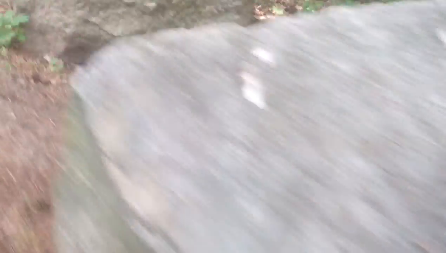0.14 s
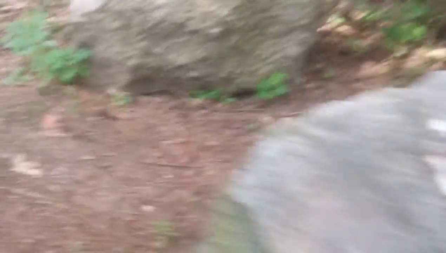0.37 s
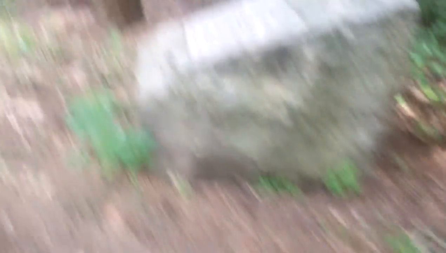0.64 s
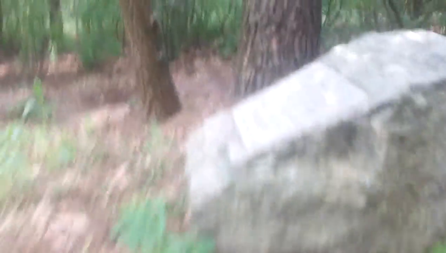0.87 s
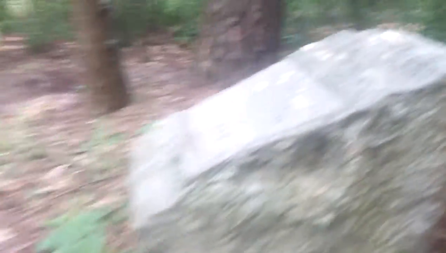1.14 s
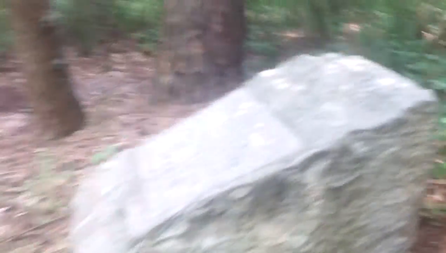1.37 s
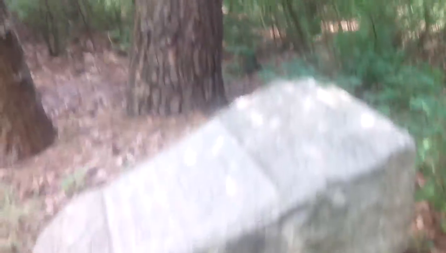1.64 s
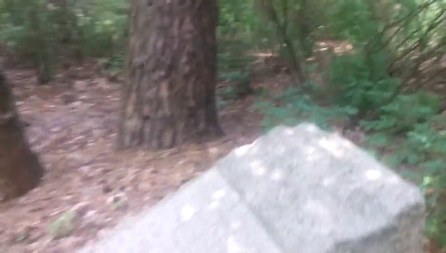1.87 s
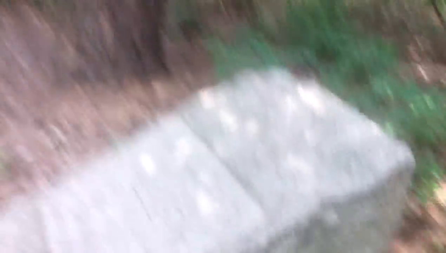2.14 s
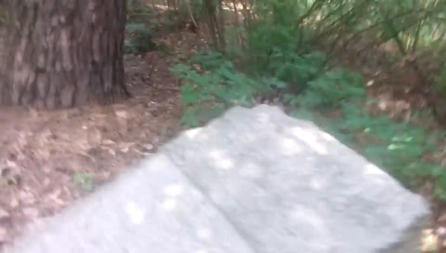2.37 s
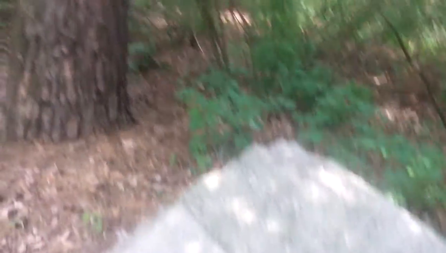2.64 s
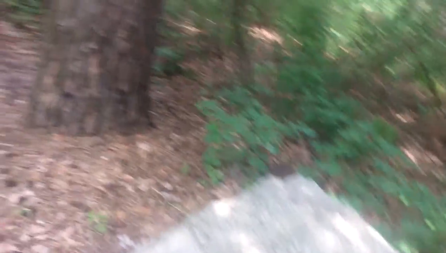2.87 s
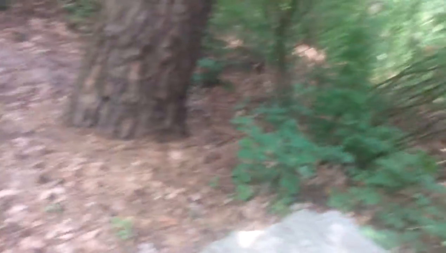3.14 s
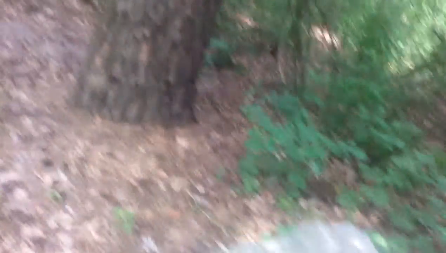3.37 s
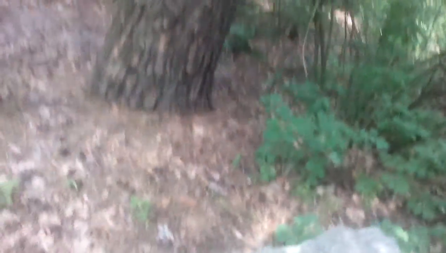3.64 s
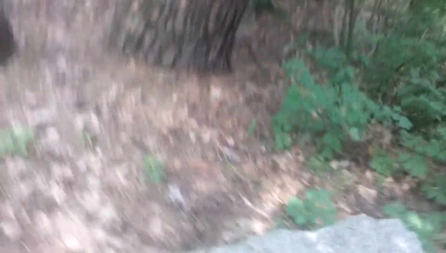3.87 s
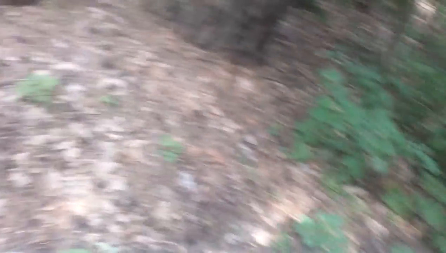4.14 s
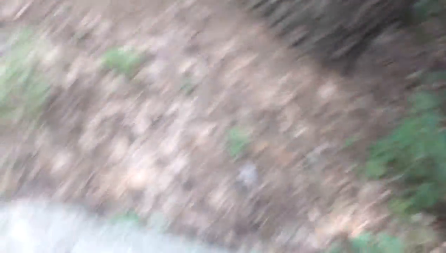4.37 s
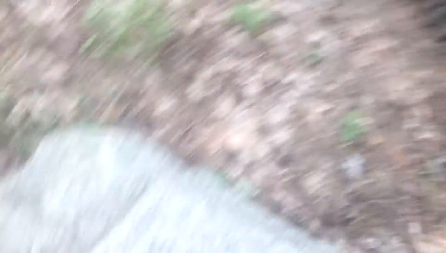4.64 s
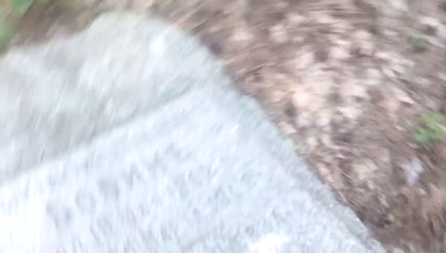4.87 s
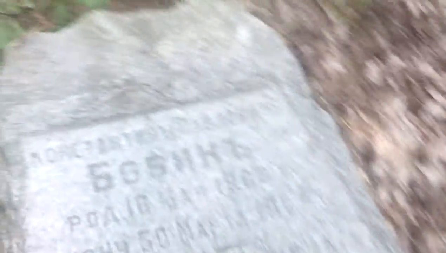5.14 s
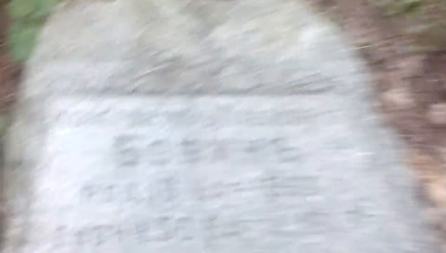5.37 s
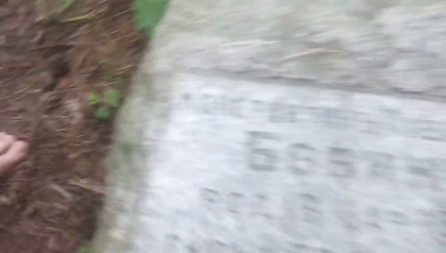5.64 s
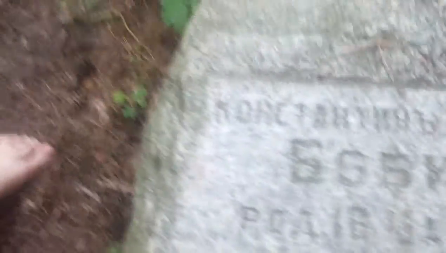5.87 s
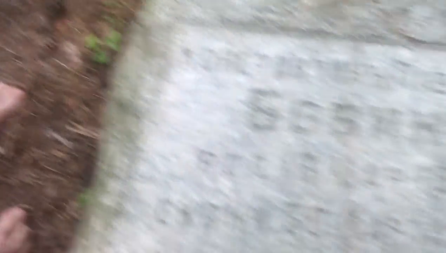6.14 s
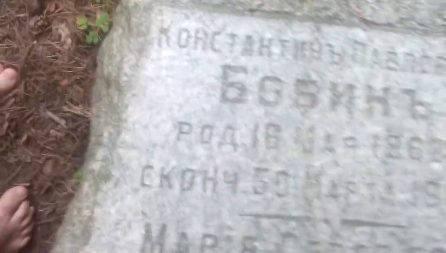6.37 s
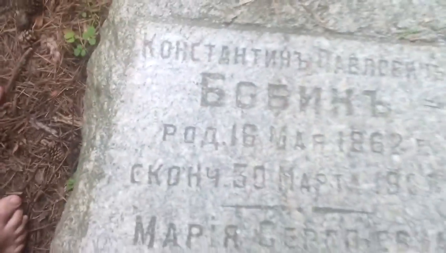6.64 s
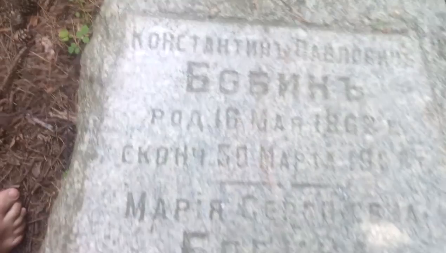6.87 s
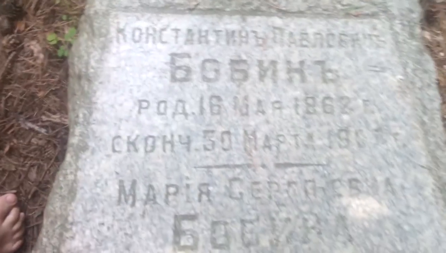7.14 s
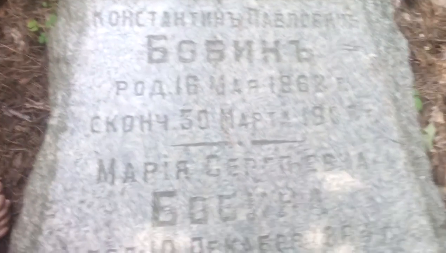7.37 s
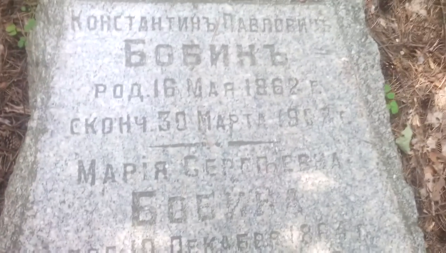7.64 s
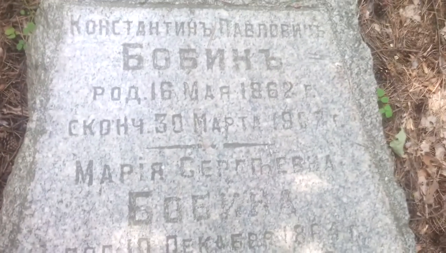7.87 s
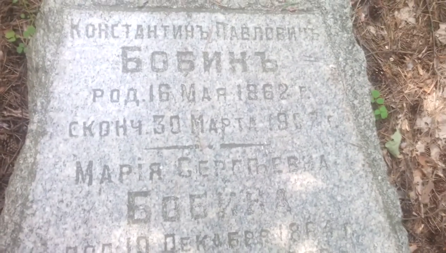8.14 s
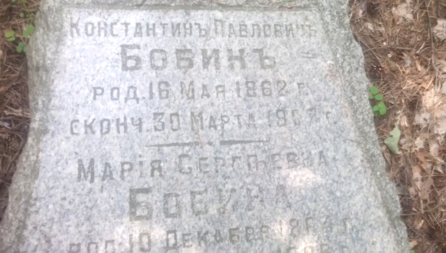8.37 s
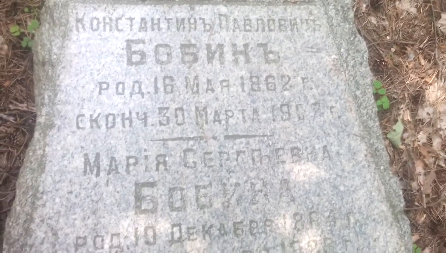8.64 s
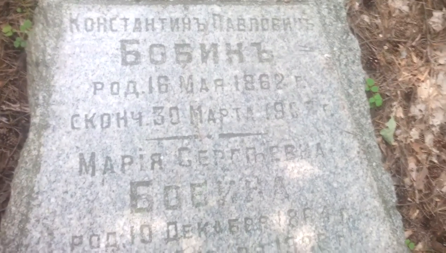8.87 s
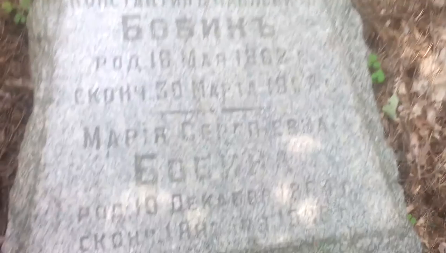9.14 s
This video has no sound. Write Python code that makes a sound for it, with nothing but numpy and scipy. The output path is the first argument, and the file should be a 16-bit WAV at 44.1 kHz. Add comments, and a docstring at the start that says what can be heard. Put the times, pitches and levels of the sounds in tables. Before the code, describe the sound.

Low handling thuds and rustling needles on a woodland floor, with thin falling bird whistles, then stillness under a faint hiss.

```python
"""Barefoot steps on a forest floor

Bare feet on soft ground, heard by a small hand-held stereo recorder. Each step jolts the recorder: a low, uneven
wobble plus filtered noise. Needles rustle on the right as shaped random grains; ticks and a twig are short ringing
modes. Songbirds whistle and buzz among the trunks as wobbling sines with a scattered tail; a fly hums faintly.
Distant rumble, microphone hiss and a late soft rush are coloured noise."""
import sys
import numpy as np
from scipy import signal
from scipy.fft import rfft, irfft, next_fast_len
from scipy.io import wavfile

SR = 44100
rng = np.random.default_rng(int(sys.argv[2]) if len(sys.argv) > 2 else 0)


def store_wav(level_fs):
    """Save 16-bit WAV to argv[1]."""
    pcm = np.round(np.clip(np.atleast_2d(level_fs), -1, 1) * 32767)
    wavfile.write(sys.argv[1], SR, pcm.T.astype(np.int16))


def linear_from_db(decibels):
    """Turn decibels (scalar or array-like) into linear amplitude factors; 0 gives 1."""
    return 10 ** (np.asarray(decibels, float) / 20)


N = 407925
T = np.arange(N) / SR


def level(x, db):
    """Scale to an rms level."""
    return x * linear_from_db(db) / np.sqrt(np.mean(x ** 2))


def colour(x, points):
    """Shape a spectrum by (Hz, dB) points, joined on a log frequency axis."""
    hz, db = np.transpose(points)
    size = next_fast_len(len(x))
    f = np.maximum(np.arange(size // 2 + 1) * SR / size, 1)
    gain = linear_from_db(np.interp(np.log(f), np.log(hz), db))
    return irfft(rfft(x, size) * gain, size)[:len(x)]


def cut(x, hz, kind, order=2):
    """Low- or high-pass."""
    return signal.sosfilt(signal.butter(order, hz, kind, fs=SR, output="sos"), x)


def walk(rate_hz, size=N):
    """Random levels joined by straight lines, rate_hz of them a second; spread 1."""
    levels = rng.standard_normal(1024)
    return np.interp(np.arange(size) * rate_hz / SR, np.arange(len(levels)), levels) / np.sqrt(2 / 3)


def hump(t, peak_s, rise_s, fall_s, span_db, power):
    """Level in dB that climbs to 0 at the peak and sinks again; times share the unit of t."""
    reach = np.where(t < peak_s, max(rise_s, .003), max(fall_s, .003))
    return -span_db * (np.abs(t - peak_s) / reach) ** power


def from_right(x, left_db, turn_hz):
    """The port pair hears a source on the right weaker on the left, with the treble reversed there."""
    low = cut(x, turn_hz, "low", order=1)
    return np.array([linear_from_db(left_db) * (2 * low - x), x])


# distant rumble and moving air: time_s, relative_level_db
RUMBLE = [(0.0, -62), (0.6, -57), (1.0, -65.5), (1.9, -60.5), (2.8, -64), (3.9, -60), (4.3, -61.5),
          (4.8, -62), (6.4, -64), (9.25, -67)]
# floor spectrum common to both ports: frequency_hz, gain_db
FLOOR_MID = [(15, -42), (25, -16.5), (55, 4), (110, 2), (170, -7), (300, -12.5), (800, -21.5), (1300, -25),
             (2400, -23), (3600, -21), (5400, -25), (6000, -29.5), (8500, -31.5), (12500, -21),
             (15800, -26)]
# floor spectrum opposed between the ports: frequency_hz, gain_db
FLOOR_SIDE = [(15, -41), (25, -15), (75, 1), (170, -6.5), (1000, -20), (1300, -21), (2400, -19),
              (5300, -10.5), (6000, -15), (8500, -11.5), (12900, -10.5), (15800, -10)]
HISS_MID_DB, HISS_SIDE_DB = -68.5, -64
AFTERSHAKE_DB, AFTERSHAKE_T60_S = -38.5, 0.37  # level relative to the jolt


def floor():
    """Shared rumble that swells, wavers and is stirred by each jolt, under a smooth wide hiss."""
    mid_noise = colour(rng.standard_normal(N), FLOOR_MID)
    rumble = level(cut(mid_noise, 300.0, "low", order=3), 0.5)
    hiss = level(cut(mid_noise, 270., "high", order=3), HISS_MID_DB)
    # the hand keeps shaking after a jolt
    shake_power = sum(
        (T > s) * linear_from_db(2 * (db + AFTERSHAKE_DB - 60 * np.abs(T - s) / AFTERSHAKE_T60_S))
        for s, db, *_ in THUMPS)
    rumble_power = linear_from_db(2 * np.interp(T, *np.transpose(RUMBLE)))
    waver = linear_from_db(1.0 * walk(11.))
    mid = np.sqrt(rumble_power + shake_power) * waver * rumble + hiss
    side = level(colour(rng.standard_normal(N), FLOOR_SIDE), HISS_SIDE_DB)
    return np.array([mid + side, mid - side])


# litter creeping under shifting weight between bursts: time_s, relative_level_db
SHUFFLE = [(0.0, -70), (0.6, -66), (0.95, -64.5), (1.5, -70.5), (2.1, -73.5), (2.7, -86.5), (4.3, -89),
           (4.65, -80.5), (5.0, -71), (5.35, -59), (5.6, -62), (6.1, -80), (6.9, -74), (7.2, -97),
           (9.25, -99)]
# needles and leaves underfoot: peak_s, relative_level_db, rise_s, fall_s, top_relative_db
RUSTLE = [(0.16, -45, 0.083, 0.11, -2.5), (0.33, -53.5, 0.16, 0.071, -3), (0.41, -47.5, 0.059, 0.065, -2),
          (0.67, -48, 0.022, 0.057, 6), (0.73, -41.5, 0.13, 0.13, -1.5), (0.82, -46, 0.055, 0.082, -9),
          (1.03, -60, 0.093, .3, -5), (1.23, -65, .2, 0.1, -6), (2.2, -55, 0.26, .1, -4.5),
          (2.4, -66.5, 0.16, 0.12, 1.5), (2.54, -66, 0.057, .06, -12.5), (3.522, -66, .03, .06, -0.5),
          (3.83, -66, 0.034, 0.34, -7), (4.239, -40.5, 0.052, 0.068, -13.5), (4.86, -50, 0.16, 0.077, -8),
          (4.96, -59, .02, 0.55, -9), (5.1, -53, 0.13, 0.077, -5), (5.44, -43.5, .06, 0.022, -1),
          (5.491, -38.5, .1, 0.049, -7), (5.73, -60, 0.088, 0.097, 0), (5.92, -64, .12, 0.15, -5),
          (6.17, -63, 0.1, 0.19, -5), (6.258, -57.5, .04, 0.088, -5.5), (6.554, -71.5, 0.17, .16, -4),
          (6.796, -58.5, 0.032, 0.14, -2.5), (6.962, -73, 0.048, 0.19, 1.5)]
# litter spectrum: frequency_hz, gain_db
RUSTLE_COLOUR = [(880, -72), (1500, -25), (2000, -22.5), (2280, -19.5), (3280, -12.5), (4040, -8.5),
                 (6360, -14), (7120, -19.5), (8470, -10.5), (10900, -7), (12000, -12), (15600, -36.5),
                 (22000, -120)]
RUSTLE_SPAN_DB = 22.5  # drop at the ends of rise and fall
BURST_LOW_DB, SHUFFLE_LOW_DB, SHUFFLE_TOP_DB = -10, 1, -1  # relative to the main band


def rustle():
    """Random grains of very uneven size blur into a hiss; low, main and top bands have own levels."""
    bed = linear_from_db(np.interp(T, *np.transpose(SHUFFLE))) ** 2
    bursts = [linear_from_db(db + hump(T, s, rise_s, fall_s, RUSTLE_SPAN_DB, 1.2)) ** 2
              for s, db, rise_s, fall_s, _ in RUSTLE]
    main_env = np.sqrt(bed + sum(bursts))
    low_env = np.sqrt(bed * linear_from_db(2 * SHUFFLE_LOW_DB) + sum(bursts) * linear_from_db(2 * BURST_LOW_DB))
    top_power = sum(b * linear_from_db(2 * row[-1]) for b, row in zip(bursts, RUSTLE))
    top_env = np.sqrt(bed * linear_from_db(2 * SHUFFLE_TOP_DB) + top_power)
    layers = []
    for _ in range(2):
        grains = rng.standard_normal(N)
        # one grain in ten gets an extra boost
        boost = np.minimum(rng.exponential(size=N), 4) * (rng.random(N) < .1)
        grains = grains * linear_from_db(4.3 * boost + 1.6 * walk(90.))
        top = cut(cut(grains, 14000.0, "high", order=6), 14500., "high", order=1)
        body = level(colour(grains, RUSTLE_COLOUR), .8)
        main = main_env * cut(body, 9300.0, "high", order=4)
        low = low_env * cut(body, 7300., "low", order=4)
        layers.append(linear_from_db(8.0) * (main + low + top_env * level(top, 6.7)))
    # other leaves reach only the left port
    scattered = linear_from_db(-14) * cut(layers[1], 9000., "high", order=1) * np.array([[1], [0]])
    return from_right(layers[0], -14.0, 2100.0) + scattered


# jolts of the hand: peak_s, relative_level_db, rise_s, fall_s, brightness_relative_db
THUMPS = [(0.329, -22, 0.018, 0.12, -30.5), (0.374, -22, 0.024, 0.039, -25.5),
          (0.402, -25.5, 0.019, 0.035, -29), (0.454, -35, 0.0077, 0.047, -29), (0.503, -46, .01, 0.13, -35),
          (0.573, -42, 0.034, 0.082, -54), (0.738, -41, 0.021, 0.06, -46), (0.84, -51.5, 0.12, 0.022, -22),
          (1.046, -34.5, 0.029, 0.054, -28), (1.23, -20, 0.016, .03, -24), (1.248, -8, 0.02, 0.029, -26),
          (1.27, -15, .02, 0.025, -32), (1.819, -36.5, 0.045, 0.024, -51), (2.047, -51, .01, 0.052, -22),
          (2.1, -45.5, .04, 0.0089, -40), (2.397, -7.5, .03, .045, -21), (2.448, -12.5, .045, 0.037, -25),
          (3.126, -20, 0.0082, 0.021, -31), (3.233, -30, 0.031, 0.027, -29),
          (3.271, -32.5, 0.036, 0.042, -21.5), (3.546, -8.5, 0.034, 0.047, -24),
          (3.766, -30.5, 0.0061, 0.028, -25.5), (3.783, -30, 0.014, 0.03, -29.5),
          (3.877, -41, 0.04, 0.026, -32), (4.142, -11, 0.03636, 0.067, -27),
          (4.188, -28.5, 0.042, 0.071, -22), (4.309, -29, 0.044, 0.043, -29), (4.45, -29, 0.028, .03, -40),
          (4.476, -7, 0.017, 0.03, -26.5), (4.514, -25.5, 0.027, 0.087, -27),
          (4.592, -21, 0.061, 0.091, -27), (4.638, -32.5, 0.048, 0.059, -34.5),
          (4.975, -40.5, 0.078, .03, -23), (5.006, -19, 0.038, 0.055, -24), (5.407, -53.5, 0.087, 0.1, -13),
          (6.14, -49, .035, .04, -24), (6.18, -46, 0.059, .035, -20), (6.996, -17, 0.018, 0.035, -26),
          (7.024, -33, 0.028, 0.042, -17.5), (8.301, -46, .045, 0.011, -32), (8.596, -47, .03, .028, -32.5)]
# spectrum of the bright edge: frequency_hz, gain_db
THUMP_EDGE = [(120, -31.5), (200, -3.5), (265, -7.5), (729, -33), (1410, -48), (2420, -52.5), (3040, -55.5),
              (5000, -63.5), (6500, -89), (11000, -120)]
WOBBLE_EXPONENT, SWING_DB, BURST_DB = .4, 1.5, 2.5  # unevenness: rate, size, edge
THUMP_SPAN_DB, THUMP_ROUND = 32, 1.606  # drop at the ends of rise and fall; roundness of the top
NOMINAL_HZ, NOMINAL_HZ_PER_DB = 112.38, 0.5556  # harder jolt, faster wobble; rate at 0 dB
CONTACT_DB, CONTACT_S, CONTACT_TOP_HZ = -27, .0025, 1000  # first touch: level re jolt, decay, low-pass
CONTACT_LEAD = .7  # share of the rise between first touch and peak


def thumps():
    """Each step jolts the hand: a low swing uneven in rate and size, with a touch and a noisy edge."""
    body, edge = np.zeros(N), np.zeros(N)
    grit = level(cut(colour(rng.standard_normal(N), THUMP_EDGE), 280.0, "high"), 0)
    for s, peak_db, rise_s, fall_s, bright_db in THUMPS:
        i, n = int((s - .1) * SR), SR // 4
        t = T[i:i + n]
        touch_s = t - s + CONTACT_LEAD * rise_s
        db = peak_db + hump(t, s, rise_s, fall_s, THUMP_SPAN_DB, THUMP_ROUND)
        db = db + 30 * np.clip(touch_s / CONTACT_S, -1, 0)  # held down before the first touch
        hz = NOMINAL_HZ + NOMINAL_HZ_PER_DB * np.maximum(db, -60)
        wrist_hz = .88 * hz * np.exp(WOBBLE_EXPONENT * np.clip(walk(190., size=n), -1.5, 2))
        swing = np.sin(2 * np.pi * np.cumsum(wrist_hz) / SR) * linear_from_db(SWING_DB * walk(120., size=n))
        # the fingers tremble about twice as fast as the wrist
        finger_hz = 1.7 * hz * np.exp(WOBBLE_EXPONENT * np.clip(walk(260., size=n), -1.5, 1.5))
        swing = swing + linear_from_db(-12) * np.sin(2 * np.pi * np.cumsum(finger_hz) / SR)
        body[i:i + n] += np.sqrt(2) * linear_from_db(db) * swing
        touch_env = (touch_s > 0) * np.exp(-np.abs(touch_s) / CONTACT_S)
        touch = linear_from_db(peak_db + CONTACT_DB) * touch_env * grit[i:i + n]
        edge[i:i + n] += cut(touch, CONTACT_TOP_HZ, "low", order=3)
        # the edge comes in bursts
        edge[i:i + n] += linear_from_db(db + bright_db + 6.5 + BURST_DB * walk(130., size=n)) * grit[i:i + n]
    mid = cut(cut(body, 400.0, "low"), 46., "high") + edge
    side = linear_from_db(-8.5) * cut(mid, 367.0, "high") + linear_from_db(-20.0) * mid  # the left port takes more of the edge
    return np.array([mid + side, mid - side])


def note(s, length_s, hz, db):
    """Rows (s, Hz, dB) from rules of the share u of the note that has passed."""
    u = np.linspace(0, 1, 24)
    return np.transpose([s + length_s * u, hz(u) + 0 * u, db(u) + 0 * u])


def unroll(table, fade_s=0.0074):
    """First sample, columns per sample and a gate with soft ends."""
    s, *columns = np.transpose(table)
    t = T[int(s[0] * SR):int(s[-1] * SR)]
    gate = np.clip(np.minimum(t - s[0], s[-1] - t) / fade_s, 0, 1)
    return int(s[0] * SR), [np.interp(t, s, c) for c in columns], gate


FLICKER_DB, FLICKER_HZ = 1.8, 45  # leaves in the path make every note flicker


def whistle(tables, flutter_hz, wobble_hz, overtone_db=-60):
    """Near-sine notes; quick random wobble of the pitch smears a whistle into a buzz."""
    out = np.zeros(N)
    for table in tables:
        i, (hz, db), gate = unroll(table)
        n = len(hz)
        phase = 2 * np.pi * np.cumsum(hz + wobble_hz * walk(flutter_hz, size=n)) / SR
        tone = np.sin(phase) + linear_from_db(overtone_db) * np.sin(2 * phase)
        out[i:i + n] += np.sqrt(2) * linear_from_db(db + FLICKER_DB * walk(FLICKER_HZ, size=n)) * gate * tone
    return out


# thin high pips: start_s, length_s, pitch_hz, relative_level_db
PIPS = [(0.387, .04, 4720, -63), (0.885, .03, 4120, -60.5), (3.812, .08, 5420, -74.5),
        (4.73, .13, 3200, -67), (4.328, 0.028, 4430, -64), (4.401, 0.05, 4090, -61.5),
        (4.595, 0.037, 4000, -81), (5.322, .06, 4640, -62), (5.579, .3, 3980, -69.5),
        (5.861, 0.27, 3990, -71), (6.118, 0.069, 3980, -62), (6.28, 0.069, 3910, -62),
        (6.47, .08, 4060, -69.5), (6.811, 0.086, 3940, -64.5)]


def pips():
    """Steady pitch under a rounded level, with moderate flutter."""
    notes = [note(s, d, lambda u: hz, lambda u: db + hump(u, .45, .55, .65, 8, 2))
             for s, d, hz, db in PIPS]
    return whistle(notes, 200.0, 82.0)


# buzzy upward sweeps: start_s, length_s, from_hz, nominal_to_hz, relative_level_db
SWEEPS = [(0.438, 0.1, 3480, 5000, -60), (1.005, 0.12, 3300, 5050, -56), (1.302, 0.12, 3190, 5050, -57),
          (1.611, 0.1, 3410, 5050, -56.5), (1.898, 0.16, 3350, 5000, -60), (2.071, 0.18, 3055, 5400, -59),
          (2.278, 0.13, 3220, 5200, -59)]


def sweeps():
    """Each sweep climbs fast, then levels off at 0.96 of its nominal top; fast flutter makes it buzz."""
    notes = [note(s, d,
                  lambda u: .96 * hi - (.96 * hi - lo) * np.maximum(1 - u / .6, 0) ** 1.4,
                  lambda u: db + hump(u, 0.56, .9, 1.4, 12, 2))
             for s, d, lo, hi, db in SWEEPS]
    return whistle(notes, 400., 150.)


# hoarse notes: start_s, length_s, pitch_hz, relative_level_db
BUZZES = [(0.604, 0.21, 6060, -56.5), (1.46, .16, 6200, -69), (5.672, 0.23, 6040, -57.5),
          (6.05, .21, 5930, -55), (6.476, 0.18, 5860, -56), (6.914, .21, 5880, -58)]


def buzzes():
    """Steady pitch made hoarse by wide, fast flutter."""
    notes = [note(s, d, lambda u: hz, lambda u: db + hump(u, 0.37, 0.37, 0.23, 21, 3.1))
             for s, d, hz, db in BUZZES]
    return whistle(notes, 300., 266.0)


# whistles that sag and settle: start_s, length_s, from_hz, toward_hz, relative_level_db
FALLS = [(1.044, 0.19, 3300, 2790, -65), (4.119, 0.062, 2390, 2414, -61), (4.362, .13, 2990, 2720, -68),
         (4.488, .16, 2680, 2407, -56), (4.62, 0.42, 2560, 2500, -69.5), (4.79, 0.19, 2347, 2043, -58),
         (4.995, 0.25, 2733, 2285, -55.5), (7.546, 0.11, 3780, 3690, -71),
         (7.611, 0.066, 5400, 5450, -69.5), (7.89, 0.094, 3470, 2900, -75), (8.23, 0.11, 3600, 2980, -75)]
SAG_SHARE, FALL_PEAK_SHARE, FALL_DROP_DB = .3, .12, 11  # shares of note length


def falls():
    """Pitch relaxes exponentially toward its end value; level peaks early."""
    notes = [note(s, d,
                  lambda u: lo + (hi - lo) * np.exp(-u / SAG_SHARE),
                  lambda u: db + hump(u, FALL_PEAK_SHARE, .3, .88, FALL_DROP_DB, 1.5))
             for s, d, hi, lo, db in FALLS]
    return whistle(notes, 120., 40.)


# slow whistles that curl upward: start_s, length_s, from_hz, to_hz, relative_level_db
RISES = [(2.561, 0.33, 5830, 7250, -68.5), (2.996, 0.34, 5685, 7400, -67.5), (3.47, .36, 5656, 7865, -66),
         (3.901, 0.34, 5590, 7040, -65)]
RISE_CURL_POWER, RISE_FADE_DB = 1.9, -6


def rises():
    """Pitch rises ever faster while the level fades."""
    notes = [note(s, d, lambda u: lo + (hi - lo) * u ** RISE_CURL_POWER, lambda u: db + RISE_FADE_DB * u)
             for s, d, lo, hi, db in RISES]
    return whistle(notes, 140.0, 73.0)


# clear falling whistles: start_s, length_s, from_hz, to_hz, relative_level_db
SLIDES = [(4.03, .06, 2160, 2170, -72), (5.26, 0.079, 1850, 1690, -70.5), (5.789, 0.15, 3510, 2605, -57.5),
          (6.185, 0.14, 3444, 2585, -56.5), (6.595, 0.15, 3480, 2723, -54),
          (7.043, 0.064, 3380, 3290, -56.5), (7.113, 0.094, 3250, 2656, -55.5),
          (7.227, 0.19, 2650, 2050, -76)]


def slides():
    """Quick onset, then pitch falls along straight segments with little flutter."""
    notes = [[(s, hi, db - 21), (s + 0.019, .98 * hi, db),
              (s + .55 * d, .5 * (hi + lo), db - 1.5), (s + d, lo, db - 16.0)]
             for s, d, hi, lo, db in SLIDES]
    return whistle(notes, 107.0, 40.0)


# slow trill: start_s, relative_level_db
TRILL = [(4.339, -67.5), (4.45, -62.5), (4.579, -58.5), (4.698, -59), (4.819, -59), (4.951, -56),
         (5.061, -56), (5.197, -56.5), (5.318, -58.5), (5.44, -60.5), (5.57, -54)]


def trill():
    """Repeated short falling notes, flutter wide enough to buzz."""
    notes = [[(s, 4700, db - 4), (s + .02, 4400, db), (s + .05, 4000, db - 8)] for s, db in TRILL]
    return whistle(notes, 340., 420.)


WOOD_T60_S, WOOD_WET_DB, NEAR_SEND_DB, AHEAD_SEND_DB = .45, 0.5, -0.5, 4.0


def birds():
    """The trunks scatter every note into a short wet tail, different on each side."""
    far = sweeps() + buzzes() + trill()
    near = falls() + slides() + pips()
    ahead = rises()
    t = T[:int(.6 * SR)]
    echoes = rng.standard_normal((2, len(t))) * 1000. ** (-t / WOOD_T60_S)
    echoes = linear_from_db(WOOD_WET_DB) * echoes / np.sqrt(np.sum(echoes ** 2, axis=1, keepdims=True))
    send = far + linear_from_db(NEAR_SEND_DB) * near + linear_from_db(AHEAD_SEND_DB) * ahead
    wet = signal.oaconvolve(send[None], echoes, axes=1)[:, :N]
    direct = from_right(far + near, -19.0, 3500.) + from_right(ahead, -29.5, 9000.)
    return direct + wet * linear_from_db([[-8.5], [0]])


# ticks and the twig: start_s, relative_level_db, two_lowest_modes_relative_db
TICKS = [(0.6659, -19, -41), (0.7194, -25, -45), (2.5292, -43, -16), (4.1817, -29.5, -27),
         (4.7117, -40.5, -19), (4.7431, -37.5, -23), (4.7623, -32, -45), (4.8349, -28.5, -41),
         (4.8823, -35, -27.5), (4.951, -38, -28), (5.1058, -30, -30), (5.248, -34.5, -31.5),
         (5.2917, -32.5, -22), (5.4727, 0, -19), (5.476, -15, -25), (5.5164, -36, -44), (6.2497, -38, -38),
         (6.798, -45, -32)]
# ringing modes: frequency_hz, relative_level_db, t60_s
TICK_MODES = [(760, -12.5, 0.00096), (1630, -5, 0.0028), (4960, -20.5, 0.0034), (8300, -14.5, 0.00043),
              (10310, -7, 0.002), (14630, -5.5, 0.0023)]
BREAK_S, BREAK_RISE_S, DEBRIS_T60_S = .0012, .0003, 0.046  # build-up, its time constant, debris decay


def ticks():
    """A break builds up in about a millisecond, rings briefly and scatters bright debris."""
    out, t = np.zeros(N), T[:SR // 8]
    noise = rng.standard_normal((len(TICKS), len(t)))
    late = np.maximum(t - BREAK_S, 0)
    rise = np.exp(np.minimum(t - BREAK_S, 0) / BREAK_RISE_S)
    for (s, db, low_db), debris in zip(TICKS, noise):
        modes = zip(TICK_MODES, (low_db, low_db, 0, 0, 0, 0))
        ring = sum(linear_from_db(mode_db + extra_db) * np.sin(2 * np.pi * hz * t) * 1000. ** (-late / t60_s)
                   for (hz, mode_db, t60_s), extra_db in modes)
        debris = cut(cut(debris, 9200.0, "high", order=5), 16000.0, "low", order=1)
        tail = linear_from_db(-20.0) * debris * 1000. ** (-t / DEBRIS_T60_S)
        i = int(s * SR)
        out[i:i + len(t)] += linear_from_db(db + 8.5) * rise * (ring + tail)
    return from_right(out, -10.5, 2400.0)


# wing rate: time_s, pitch_hz
WINGS = [(0.85, 278), (1.07, 281), (1.25, 250), (1.5, 308.5), (1.62, 271.7), (1.8, 270), (1.93, 286),
         (2.17, 276.4), (2.3, 247), (5.55, 323), (5.752, 268.6), (5.806, 289.4), (5.958, 262.8), (6.1, 291),
         (6.2, 219.5), (6.43, 217.8), (6.52, 201.8), (6.62, 230.3), (6.75, 212.3), (6.93, 225),
         (7.4, 210.6), (8.2, 201.8), (8.36, 275), (8.48, 276), (8.61, 233), (8.8, 194)]
# passes: start_s, length_s, relative_level_db
FLY = [(0.851, 0.43, -78), (1.33, .97, -77.5), (5.55, 0.54, -75.5), (6.221, 0.69, -74.5), (7.3, 0.77, -76),
       (8.249, 0.57, -78)]


def fly():
    """A faint hum that follows the wing rate and comes and goes as the fly turns."""
    passes = [note(s, d, lambda u: np.interp(s + d * u, *np.transpose(WINGS)), lambda u: db)
              for s, d, db in FLY]
    return linear_from_db(3.5 * walk(7.)) * whistle(passes, 25., 4., overtone_db=-19.5)


# soft rush: width_s, level_db
RUSH = (0.14, -65)
RUSH_PEAK_S = 7.93


def rush():
    """A soft low rush of filtered noise rises and fades off to the right."""
    width_s, level_db = RUSH
    noise = cut(cut(rng.standard_normal(N), 430.0, "high", order=3), 360.0, "low", order=3)
    envelope = np.exp(-((T - RUSH_PEAK_S) / width_s) ** 2)
    return envelope * level(noise, level_db) * linear_from_db([[-7.5], [0]])


def scene():
    """All sources at the two ports."""
    return floor() + rustle() + thumps() + birds() + ticks() + fly() + rush()


def roll_off(x):
    """The treble ends steeply here."""
    return signal.sosfilt(signal.butter(12, 16650, fs=SR, output="sos"), x)


def record(dry):
    """The recorder drops the deepest bass and the top, then clips at full scale."""
    top = signal.ellip(10, .3, 80, 15850, fs=SR, output="sos")  # steep low-pass, Hz
    mix = np.clip(signal.sosfilt(top, cut(dry, 25.0, "high")), -1, 1)
    return roll_off(mix)


dry = scene()
out = record(dry)
store_wav(out)
```